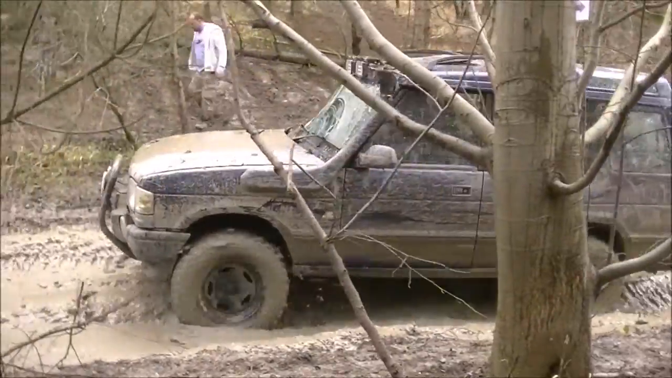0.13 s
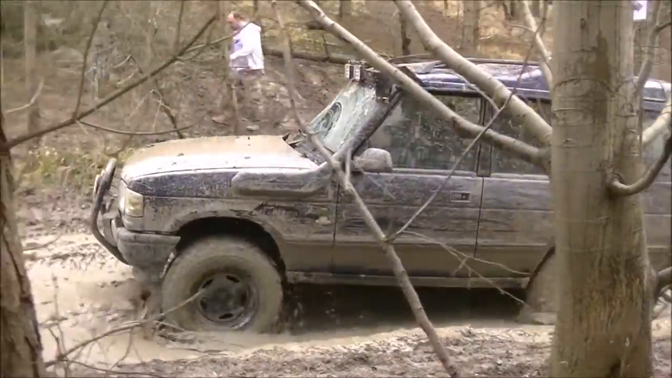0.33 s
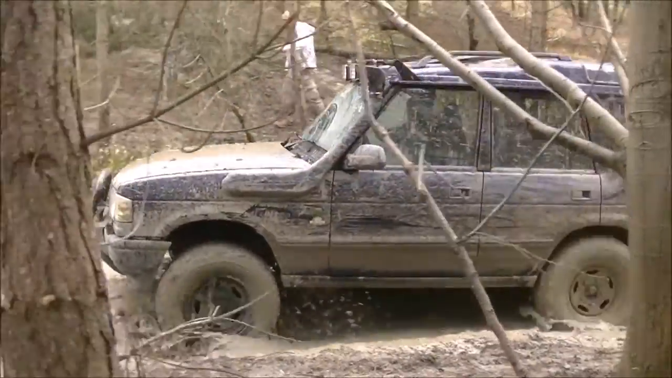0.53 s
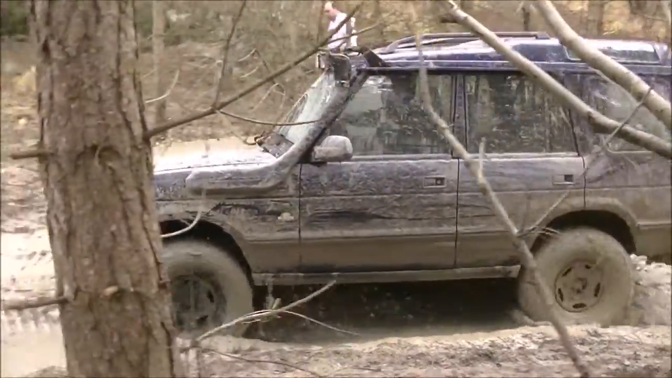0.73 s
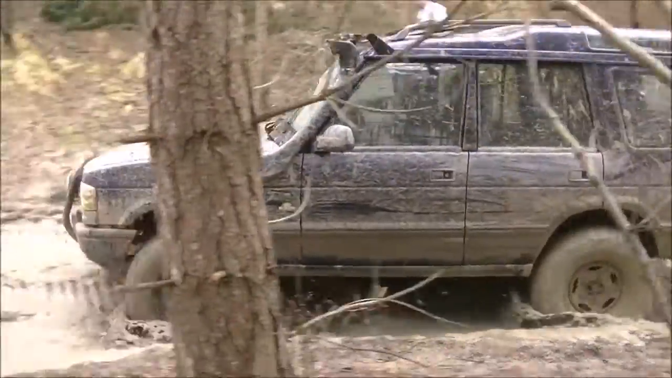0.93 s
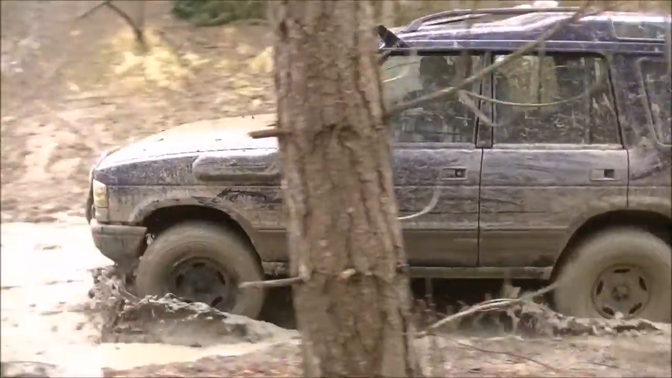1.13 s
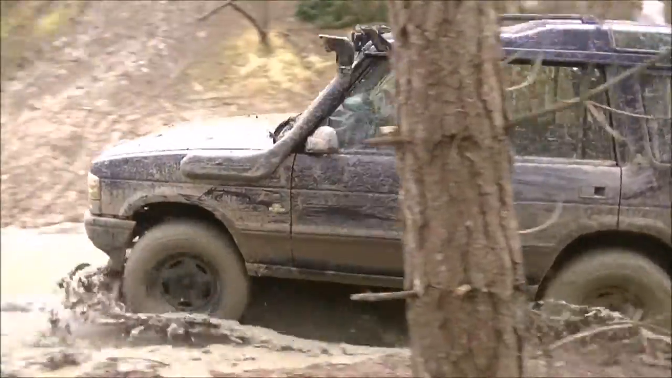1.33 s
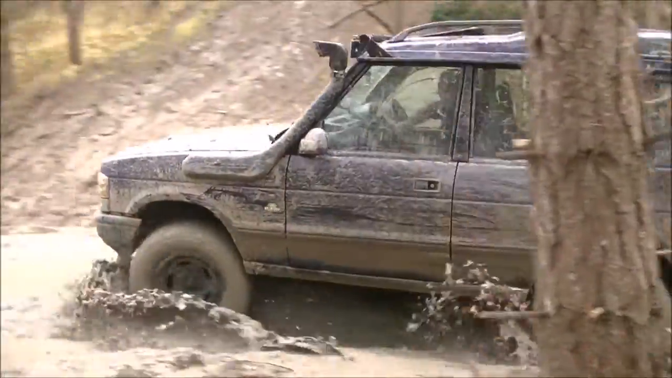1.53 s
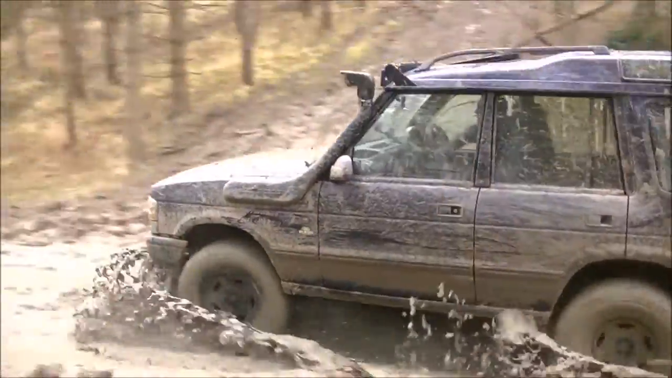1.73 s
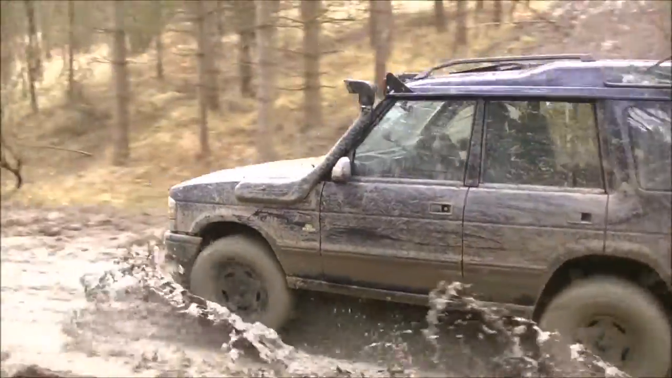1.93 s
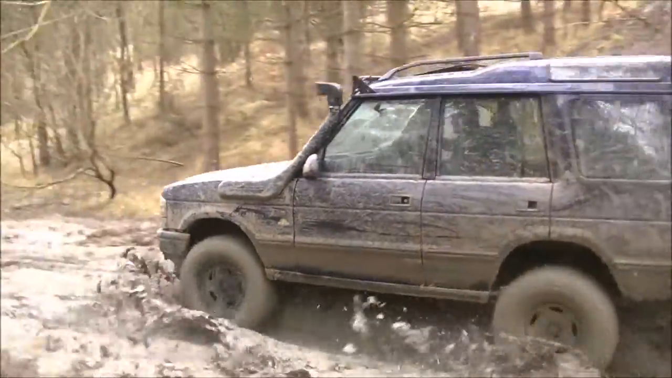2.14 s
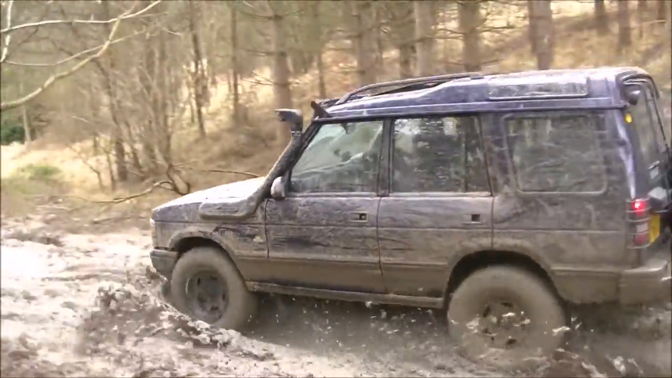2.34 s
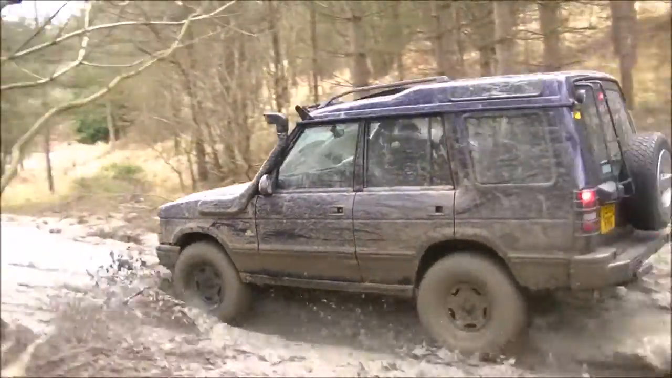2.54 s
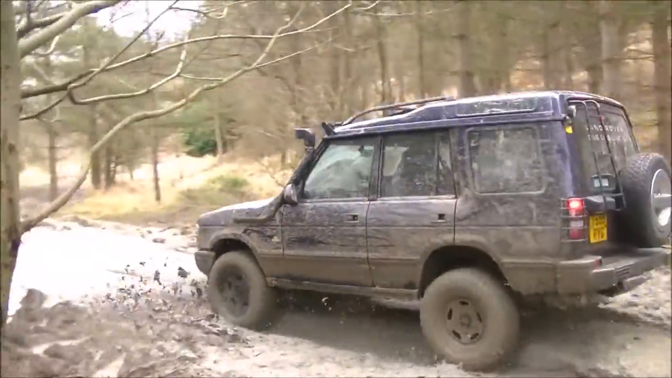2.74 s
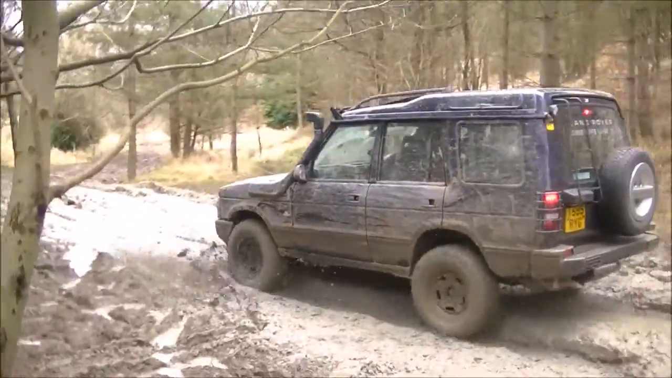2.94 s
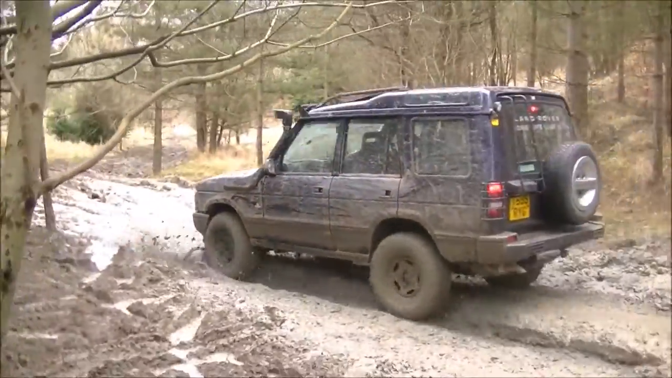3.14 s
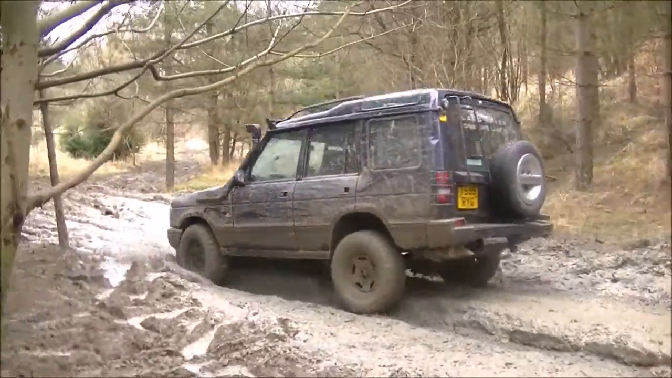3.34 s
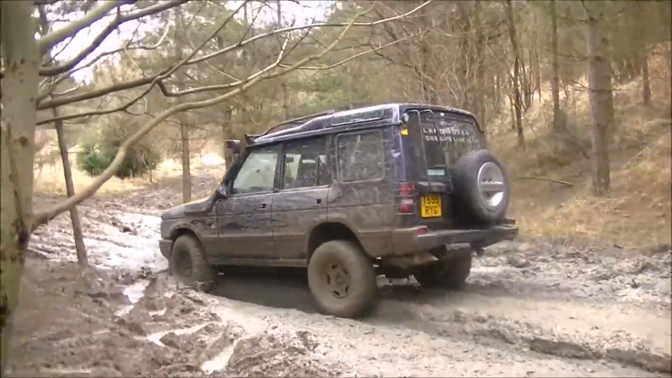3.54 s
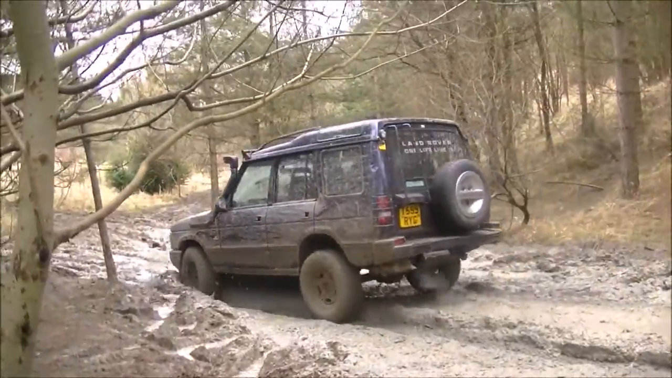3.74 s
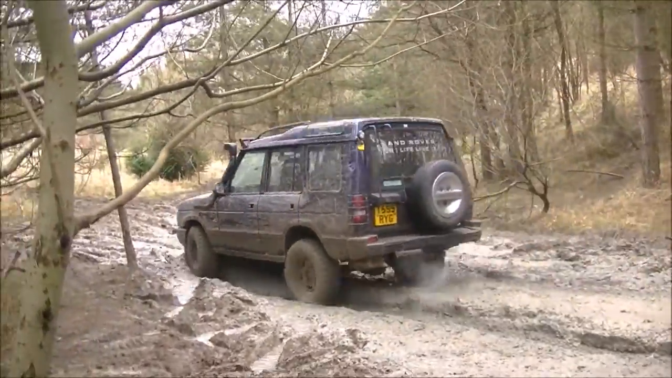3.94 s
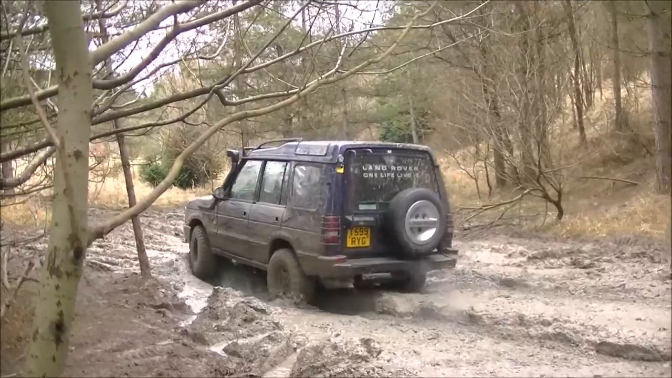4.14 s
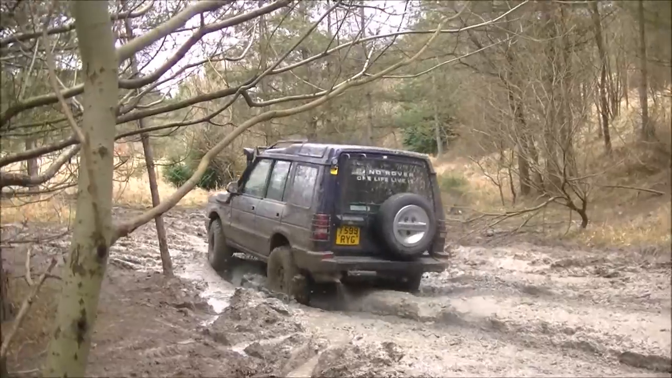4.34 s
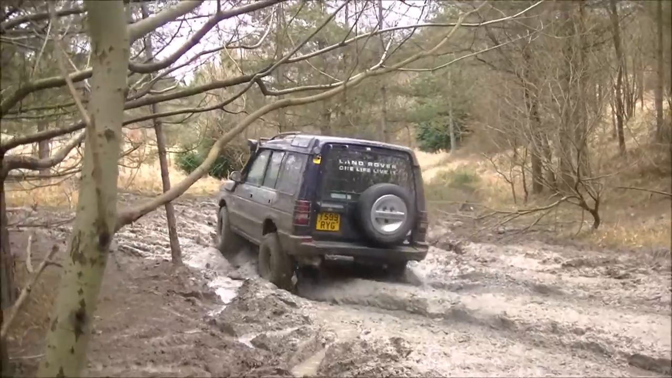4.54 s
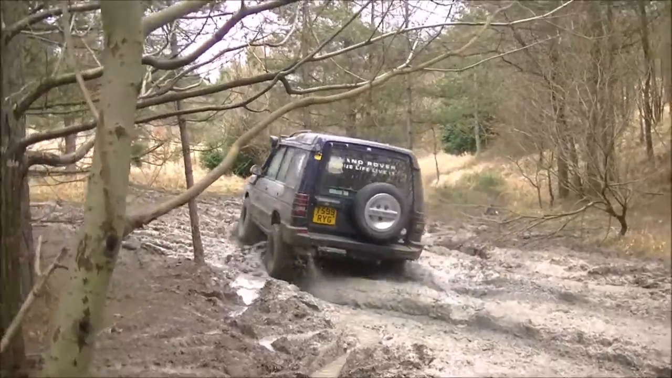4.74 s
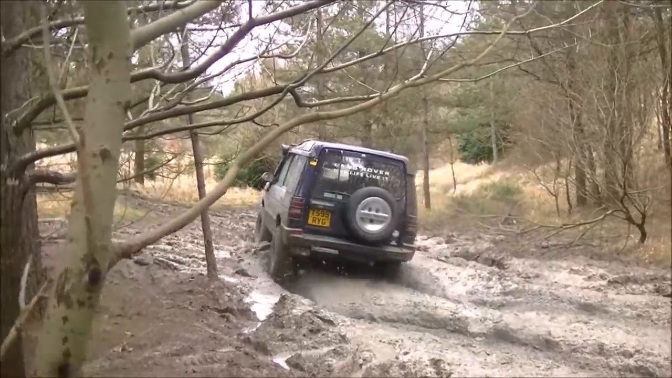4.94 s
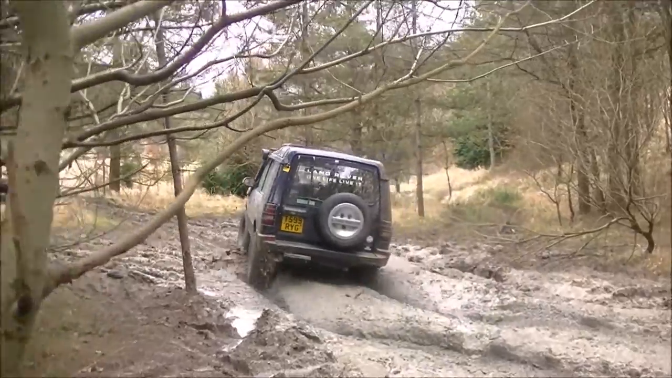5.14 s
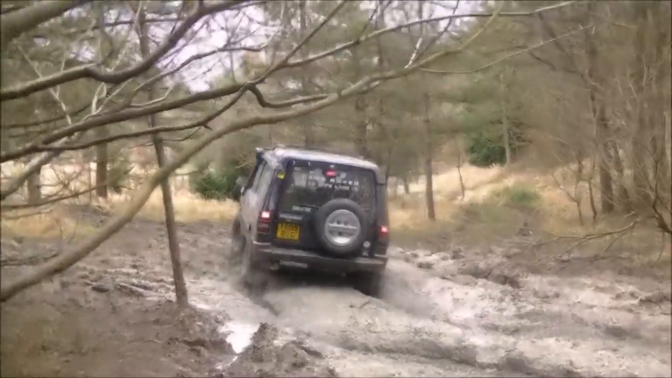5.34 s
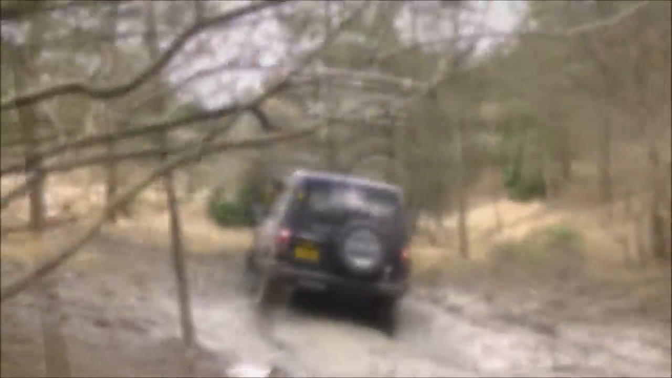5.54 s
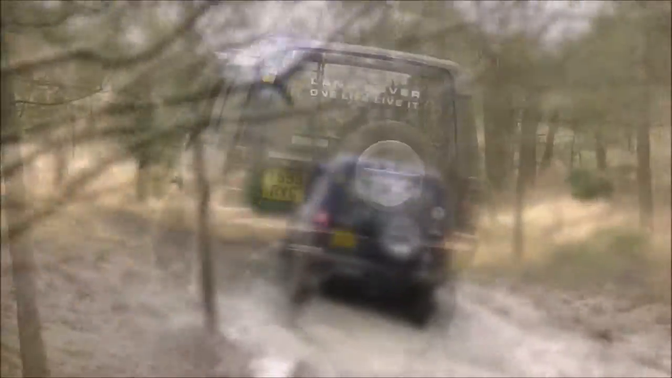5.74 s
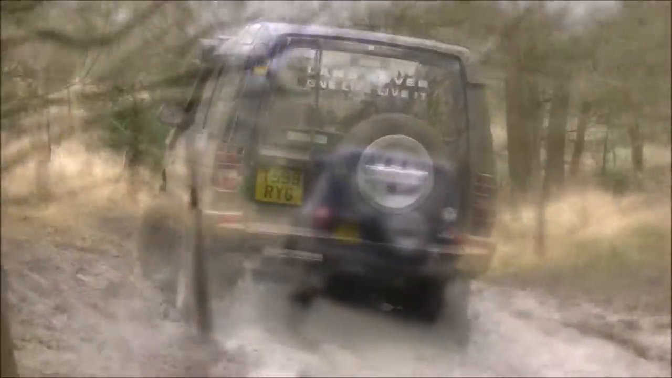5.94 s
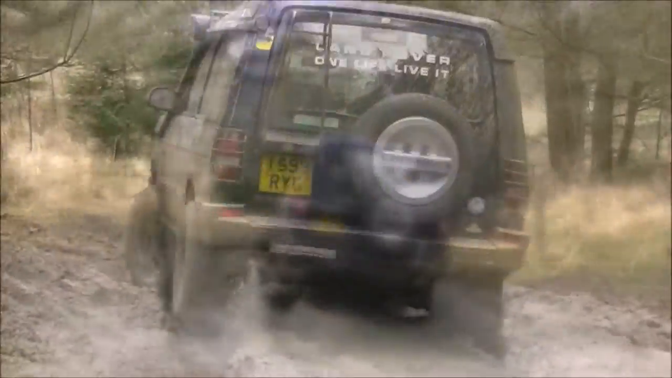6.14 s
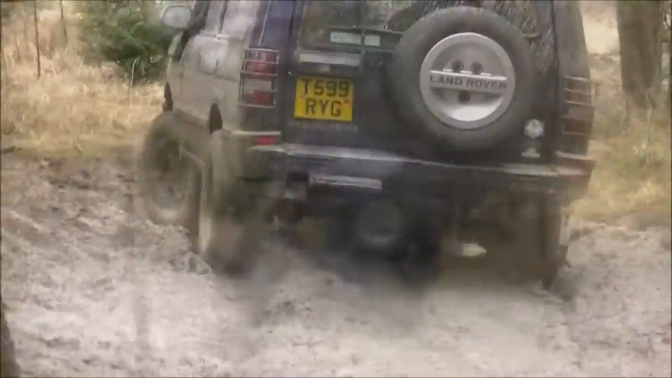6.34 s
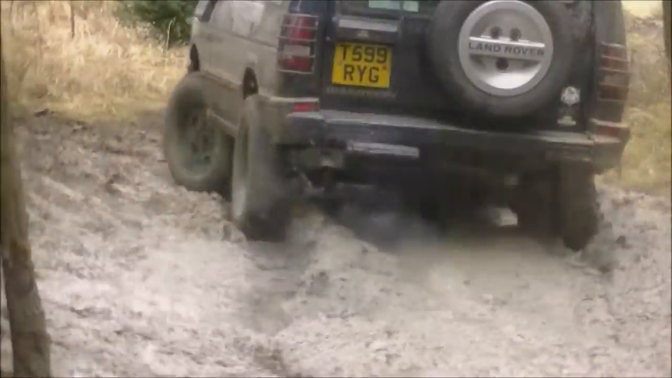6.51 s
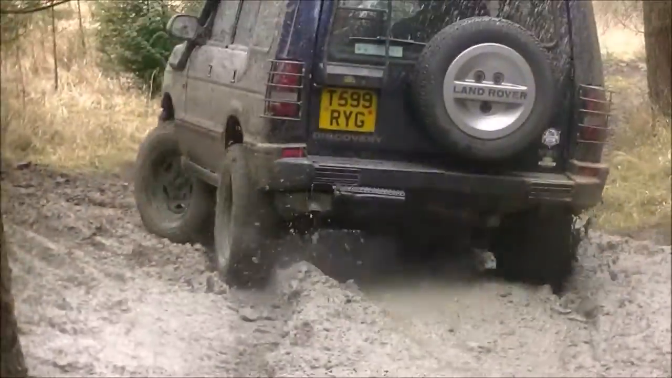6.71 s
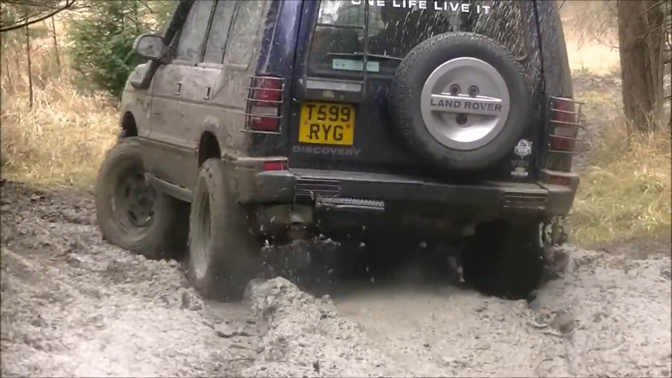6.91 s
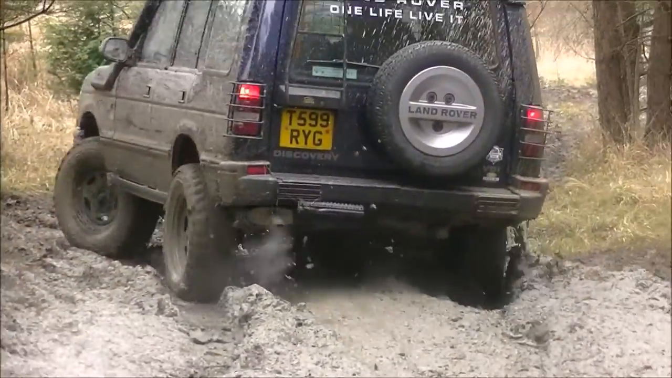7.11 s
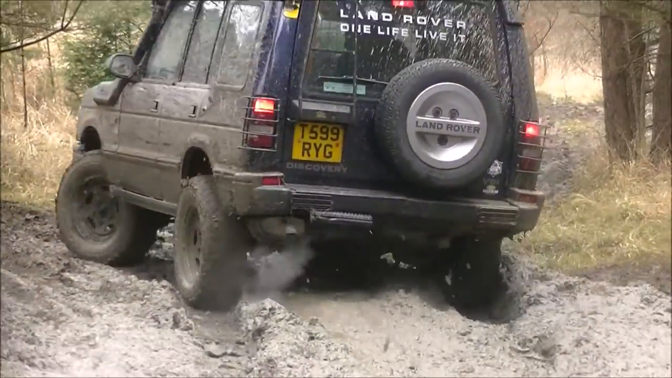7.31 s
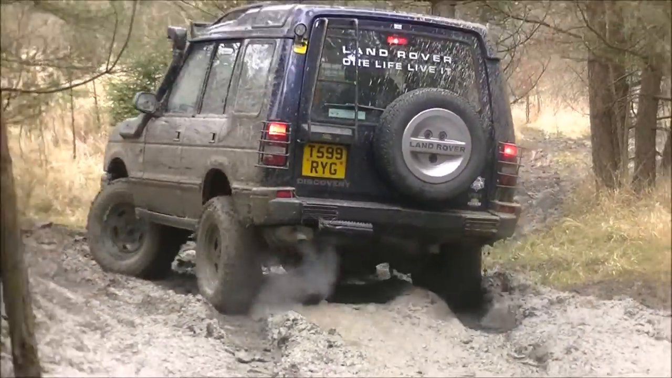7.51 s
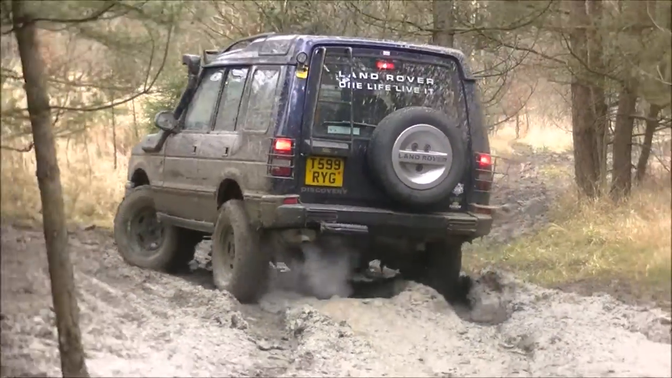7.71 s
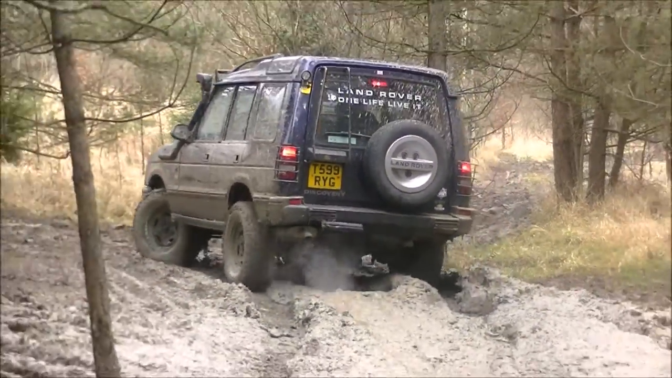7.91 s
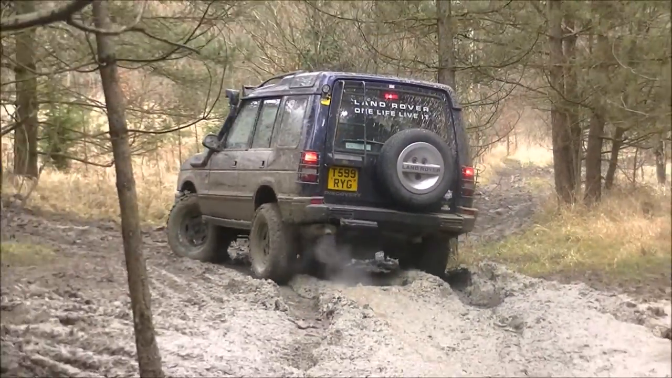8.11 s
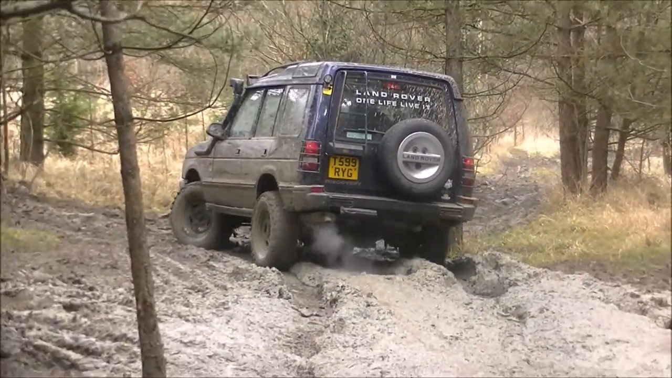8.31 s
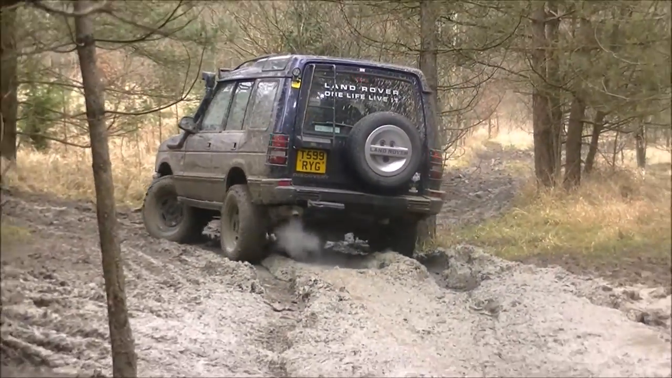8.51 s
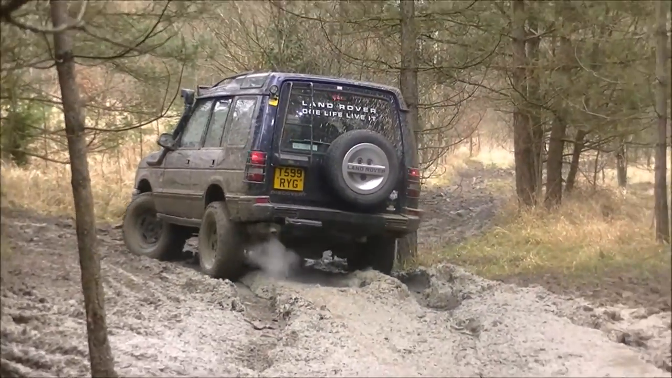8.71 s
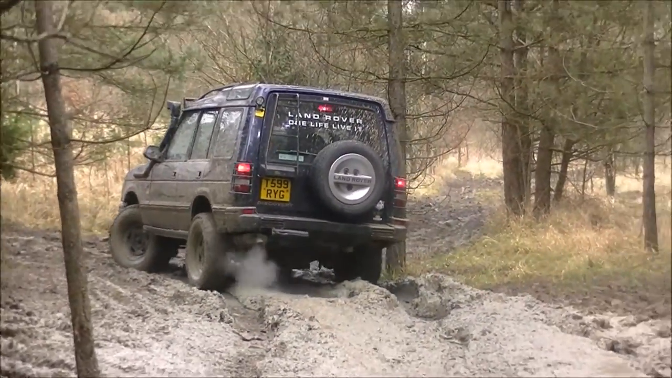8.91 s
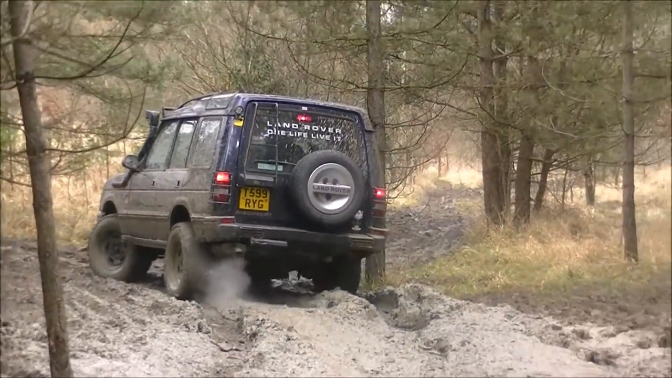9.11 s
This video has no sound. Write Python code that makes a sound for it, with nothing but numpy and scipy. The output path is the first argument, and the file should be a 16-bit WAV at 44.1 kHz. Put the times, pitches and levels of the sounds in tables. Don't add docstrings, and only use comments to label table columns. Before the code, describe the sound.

A heavy off-road vehicle ploughs through a muddy woodland track. Slosh and hissing spray swell to a peak around two seconds while the engine and whining fan climb, then ease. Two more revs follow with sharp wet slaps and hard cracks near the microphone. The wheels slow, lumps drop off, and a quiet idle remains with drips and ticks. Small, bright, bass-light camera microphone, overloading on the hardest hits.

```python
import sys
import numpy as np
from scipy import signal
from scipy.fft import rfft, irfft, next_fast_len
from scipy.io import wavfile
from scipy.ndimage import uniform_filter1d

SR = 44100
rng = np.random.default_rng(int(sys.argv[2]) if len(sys.argv) > 2 else 0)


def decibels_to_gain(level_db):
    exponent = np.asarray(level_db, float) / 20
    return 10 ** exponent


def store_pcm(level_fs):
    pcm = np.round(np.clip(level_fs, -1, 1) * 32767).astype(np.int16)
    wavfile.write(sys.argv[1], SR, np.atleast_2d(pcm).T)


N = 408366
HZ = np.fft.rfftfreq(next_fast_len(N + SR // 2), 1 / SR)
MID_LOAD_DB = -40

# t/s, fan whine f/Hz, load level/dB, belt grip level/dB
ENGINE = [(0.0, 412.4, -40, 4), (0.62, 444.7, -37.5, 1), (0.85, 485.1, -36, -6), (1.0, 521.3, -33.5, -5),
          (1.3, 575, -36, 3), (1.42, 605, -30.5, -11), (1.6, 640, -37, 2.5), (1.85, 678.5, -34.5, 4.5),
          (2.02, 585, -40, 1.5), (2.24, 480, -38, -2), (2.84, 326, -47.5, 0), (3.9, 290, -51, -4),
          (4.2, 461.6, -36.5, -8), (4.5, 519.3, -35.5, -3), (4.8, 545, -39.5, -6), (5.0, 571, -38, 2.5),
          (5.35, 390.2, -48.5, -9), (5.72, 465.6, -43, 2), (5.95, 530, -38, -9), (6.12, 575, -36, -3),
          (6.33, 605, -37, 1), (6.5, 612, -35.5, -9), (6.68, 625, -38, -2), (6.85, 632, -38, 1.5),
          (7.0, 560, -38.5, -4), (7.17, 450, -46, 3), (7.45, 200, -58, 2), (7.7, 107.8, -64, 0.1)]
# t/s, churn level/dB, fineness of the spray/dB, depth of the slop/dB
CHURN = [(0.0, -28.5, 0.5, 1), (0.35, -24, 2, 0.5), (0.8, -21, 1, -1.5), (1.3, -17, 0, -1),
         (1.7, -16.5, 1.5, 0), (2.0, -16.5, 1, -1), (2.3, -15.5, 3.5, 0.5), (2.55, -18.5, 3, 0.5),
         (2.93, -19, 0.5, 0.5), (3.25, -24, 2, -1), (3.65, -26, 1, 3), (4.0, -27.5, 0, 1),
         (4.8, -23.5, -2.5, 0.5), (5.18, -25, -0.5, 1.5), (5.38, -29.5, 1.5, 0), (5.93, -31, -1, 0),
         (6.4, -26.5, -5, -1.5), (6.8, -27.5, -4, -0.5), (7.05, -31, -2, -1.5), (7.3, -35, -1.5, -2),
         (7.7, -43.5, -1, -1), (8.13, -49, 0, 0.5), (8.45, -50, 0.5, 0.5), (8.8, -53.5, -1, 1.5)]
# f/Hz, level/dB
CAPSULE = [(60, -77), (130, -24.5), (300, -10), (500, -6), (700, -5), (1100, -2), (2000, 2)]
# f/Hz, level/dB
PORT = [(2900, 0.5), (3800, 1), (4400, 5), (4900, -2), (5400, -8.5), (6600, -11), (7900, -6.5),
        (9000, -13.5), (10700, -23.5), (11700, -16), (14000, -19), (15700, -21.5), (15900, -55)]


def along(points):
    f, v = np.transpose(points)
    return np.interp(np.log(HZ + 1), np.log(f + 1), v)


def curves(rows):
    s, *cols = np.transpose(rows)
    return [np.interp(np.arange(N) / SR, s, c) for c in cols]


def filtered(x, response):
    m = 2 * len(HZ) - 2
    return irfft(rfft(x, m) * response, m)[..., :N]


def microphone_db():
    return along(CAPSULE + PORT)


def heard(x):
    m = 2 * len(HZ) - 2
    return x * np.sqrt(N * m / 2) / np.linalg.norm(rfft(x, m) * decibels_to_gain(microphone_db()))


def band(lo_hz, hi_hz):
    low, high = 1j * HZ / lo_hz, 1j * HZ / hi_hz
    rise = low ** 2 / (1 + np.sqrt(2) * low + low ** 2)
    fall = 1 / (1 + np.sqrt(2) * high + high ** 2)
    return (rise * fall) ** 2


def resonances(modes):
    total = 0
    for k, (hz, width, db) in enumerate(modes):
        total = total + (-1) ** k * decibels_to_gain(db) * 1j * HZ * width / (hz * hz - HZ ** 2 + 1j * HZ * width)
    return total


def wobble(rate):
    knots = rng.standard_normal(int(N * rate / SR) + 2)
    return np.interp(np.arange(N) * rate / SR, np.arange(len(knots)), knots)


def droplets(hz, cycles, spread_db, count):
    u = rng.random((count, 2))
    f = hz * np.exp(0.41 * np.clip(rng.standard_normal((count, 1)), -1.3, 2.5))
    size = decibels_to_gain(-spread_db * np.log(u[:, 1:] + 0.03))
    k = np.arange(int(4 * max(cycles, 0.5) * SR / hz))
    ring = size * np.sin(2 * np.pi * f * k / SR) * np.exp(-k * f / SR / cycles)
    start = (u[:, :1] * N).astype(int)
    return np.bincount((start + k).ravel(), ring.ravel(), N)[:N]


def splash(edges, surge, drops, drop_db, patchy_db):
    z = signal.stft(rng.standard_normal(N + 512), nperseg=256)[2]
    field = rng.standard_normal(z.shape)
    field = uniform_filter1d(uniform_filter1d(field, 4, 0), 8, 1)
    rush = signal.istft(z * decibels_to_gain(patchy_db * field / field.std()), nperseg=256)[1][:N]
    water = rush / rush.std() + decibels_to_gain(drop_db) * drops / drops.std()
    return heard(decibels_to_gain(surge) * filtered(water, edges))


def churn():
    churn_db, fine_db, _ = curves(CHURN)
    late = np.arange(N) / SR - 9.01
    rise_s, fall_s = 0.023, 0.046
    slide_db = 9 * np.exp(np.minimum(late / rise_s, -late / fall_s))
    return churn_db + slide_db, fine_db + 0.83 * slide_db


def mud():
    # f/Hz, width/Hz, level/dB
    arch = [(700, 97, -29)]
    churn_db, fine_db = churn()
    load, stir = curves(ENGINE)[1] - MID_LOAD_DB, churn_db + 25
    wallow_db = -32 + 0.76 * load + 0.54 * stir
    slosh_db = -25 + 0.13 * load + 0.92 * stir - 0.41 * fine_db + curves(CHURN)[2]
    spray_db = churn_db + 1.28
    mist_db = churn_db - 9 + 0.95 * fine_db
    trickle_db = -39.5 + 0.54 * stir

    surge = 1.2 * wobble(3.9) + 2.4 * wobble(9) + 1.2 * wobble(20) + 2.0 * wobble(80)
    lumps = 6 * np.tanh(surge / 6)
    clods = droplets(hz=1520, cycles=0.48, spread_db=1.8, count=2500)
    spatter = droplets(hz=4500, cycles=1.0, spread_db=4, count=6000)

    hollow = band(504, 868) * band(380, 20000) * (1 + resonances(arch))
    wallow = splash(hollow, 0.3 * lumps, clods, drop_db=-20, patchy_db=1.8)
    slosh = splash(band(787, 3700), 0.32 * lumps, clods + 1.23 * spatter, drop_db=-10.5, patchy_db=1.3)
    spray = splash(band(3030, 6370), 0.2 * lumps, spatter + 0.45 * clods, drop_db=-7.0, patchy_db=1.16)
    mist = splash(band(7160, 17200), 0.45 * lumps, spatter, drop_db=-4.5, patchy_db=0.2)
    trickle = splash(band(5200, 6800), 0.5 * lumps, spatter, drop_db=-10, patchy_db=2)
    deep = decibels_to_gain(wallow_db) * wallow + decibels_to_gain(slosh_db) * slosh
    return deep + decibels_to_gain(spray_db) * spray + decibels_to_gain(mist_db) * mist + decibels_to_gain(trickle_db) * trickle


def firings(rate, sizes_db, scatter_db):
    count = np.cumsum(rate / SR)
    at = np.flatnonzero(np.diff(np.floor(count))) + 1
    size_db = np.take(sizes_db, count[at].astype(int), mode="wrap")
    pulses = np.zeros(N)
    pulses[at] = decibels_to_gain(size_db + scatter_db * rng.standard_normal(len(at)))
    return pulses / np.sqrt(rate), count


def exhaust(whine_hz, load):
    # f/Hz, width/Hz, level/dB
    pipe = [(200, 110, -0.5), (342, 73, 0.5), (450, 58, 1.5), (757, 75, -6.5)]
    cylinders = [-2, 5.5, -26, -6, 0, -25, -4.5, -31]
    t = np.arange(N) / SR
    fan_ratio = 8.72
    pulses, count = firings(4 * whine_hz / fan_ratio, cylinders, scatter_db=5.0)
    gas = 1.3 * rng.standard_normal(N) * (1 + np.cos(2 * np.pi * count)) / np.sqrt(SR)
    throb = heard(filtered(decibels_to_gain(-0.6 * t) * pulses + gas, resonances(pipe) * band(110, 980)))

    boom = decibels_to_gain(-1 - 2.2 * t + 3 * wobble(9)) * np.sin(2 * np.pi * count + 0.5 * wobble(30))
    drone = heard(filtered(gas, resonances([(458.7, 24, 0)]) ** 2))
    drone = decibels_to_gain(-14 + 0.4 * load + 3.5 * wobble(8)) * drone
    return decibels_to_gain(0.87 * load - 42.5) * (throb + boom + drone)


def belts(whine_hz, load, grip_db):
    # pitch over the fan's, level/dB
    pulley_tones = [(0.74, -14), (1.15, -7), (1.27, -9)]
    # f/Hz, width/Hz, level/dB
    bonnet = [(485, 28, 1), (590, 56, 2.5), (765, 85, 0.5)]
    whine_db = -45.5 + grip_db + 5.5 * np.log2(whine_hz / 500) + 0.75 * load
    whine_db = whine_db - 0.39 * np.arange(N) / SR
    turn = 2 * np.pi * np.cumsum(whine_hz * (1 + 0.012 * wobble(40) + 0.006 * wobble(6))) / SR
    whine = decibels_to_gain(3.2 * wobble(17) + wobble(7) + 2.5) * heard(np.sin(turn))
    for ratio, db in pulley_tones:
        whine += decibels_to_gain(db - 2 + 4 * wobble(7)) * heard(np.sin(ratio * turn + 1.5 * wobble(25)))
    panels = 1 + sum(np.abs(resonances([panel])) for panel in bonnet)
    return filtered(decibels_to_gain(whine_db - 4.5) * whine, panels)


def engine():
    whine_hz, load_db, grip_db = curves(ENGINE)
    load = load_db - MID_LOAD_DB
    return exhaust(whine_hz, load) + belts(whine_hz, load, grip_db)


def slaps():
    # t/s, peak level/dB, f/Hz
    splats = [(0.402, -8, 4080), (2.462, 2.5, 4270), (2.498, 5, 4300), (2.901, -2.5, 1960),
              (2.928, -3, 2360), (2.997, 0, 4470), (3.505, -9, 4100), (3.511, -6, 3340), (3.742, -11, 4000),
              (3.842, -9, 4280), (3.904, -19, 3920), (4.066, -7.5, 870), (4.103, -2, 4170),
              (4.14, -12, 905), (4.155, -13, 700), (4.206, -10, 4500), (4.267, -12, 4185),
              (4.297, -20, 4200), (4.316, -14, 1200), (2.717, -13, 4330), (2.976, -14, 4330),
              (3.168, -6, 4050), (3.209, -11, 2164), (3.562, -14, 1510), (4.663, -7.5, 1600),
              (4.69, -5, 2130), (4.697, -6, 920), (4.772, -15, 2203), (5.177, -8.5, 2317),
              (5.432, -12.5, 2060), (4.082, -5.5, 1900), (4.097, -8, 4470), (4.124, 0.5, 2230),
              (4.259, -7, 730), (4.278, -5.5, 780), (4.5, -8, 1640), (4.524, -15, 996), (4.841, -5.5, 970),
              (4.977, -3.5, 4300), (5.04, -4.5, 2068), (5.057, -6.5, 2050), (5.095, -4, 4480),
              (5.201, -7.5, 2263), (5.301, -7.5, 2100), (5.553, -14, 1813), (5.623, -12.5, 2264),
              (5.658, -12.5, 1540), (5.938, -10, 650)]
    # t/s, peak level/dB, f/Hz
    wheel_lumps = [(6.986, -6, 1943), (7.138, -17, 3560), (7.174, -23, 2077), (7.205, -11, 1940),
                   (7.213, -7.5, 2100), (7.236, -13, 1780), (7.298, -26, 2467), (7.345, -12, 2380),
                   (7.373, -13, 1720), (7.376, -16, 2500), (7.196, -21, 4400), (7.127, -20, 4400),
                   (7.75, -30, 700), (7.396, -17, 2670), (7.415, -19, 3100), (7.463, -28, 2080),
                   (7.54, -27, 3160), (7.579, -19, 3470), (7.58, -27, 650), (7.6, -22, 2390),
                   (7.623, -19.5, 1790), (7.681, -18, 3900), (7.693, -28, 2720), (7.703, -22, 1675),
                   (7.743, -36, 2180), (7.765, -34, 3190), (7.779, -26, 3080), (7.794, -26, 1940),
                   (7.852, -24, 1870), (7.883, -15.5, 1830), (7.906, -24, 2400), (8.133, -15.5, 3150),
                   (7.648, -27, 1800), (7.832, -30, 2280), (8.209, -36.5, 1490), (8.319, -33, 1500),
                   (9.075, -26, 2960), (9.178, -22, 1410)]
    # t/s, peak level/dB, f/Hz
    drips = [(7.7074, -21, 4500), (7.721, -31, 4400), (7.8074, -32, 4300), (7.8584, -28, 4220),
             (7.9224, -26, 4240), (7.9478, -28, 4040), (8.1125, -29, 2400), (8.1604, -28, 4270),
             (8.2003, -25.5, 4380), (8.2382, -36, 3980), (8.2581, -25, 4360), (8.2704, -29, 4300),
             (8.2985, -30, 4240), (8.3944, -36, 3910), (8.4644, -32, 4400), (8.5819, -27, 4390),
             (8.6168, -31, 4330), (8.6552, -22, 4270), (8.6722, -21.5, 4450), (8.6804, -33, 4440),
             (8.808, -36, 4110), (8.8504, -27, 3680), (8.8672, -29, 3980), (8.9087, -33, 4310),
             (8.995, -28, 4260), (9.0197, -31, 4820)]
    # t/s, peak level/dB, f/Hz
    grit = [(7.0674, -31, 7970), (7.1264, -33, 8370), (7.1384, -32, 8410), (7.1774, -34, 8030),
            (7.2045, -29, 7400), (7.2394, -37, 8020), (7.3024, -29, 8370), (7.3143, -32, 7930),
            (7.3971, -38, 7900), (7.4254, -36, 7800), (7.4994, -28, 8050), (7.5797, -37, 7890),
            (7.6814, -38, 7680), (7.7747, -36, 8030), (8.0895, -40, 8170), (8.2003, -42, 7970),
            (8.2574, -42, 7980), (8.2801, -34, 8060), (8.3958, -42, 8080), (8.7226, -40, 7560),
            (8.777, -44, 7880), (8.8493, -48, 8460), (8.98, -37, 7520), (9.1524, -42, 7490)]
    # level/dB, thud level/dB, snap level/dB, 60 dB decay/s, breadth of pitch
    splat = (0.3, -20, -30, 0.015, 1.9)
    lump = (-0.5, -14, -32, 0.006, 2.3)
    drip = (1.5, -24, -28, 0.011, 1.6)
    fleck = (-1.5, -40, -40, -1, 1.5)
    kinds = [(splats, splat), (wheel_lumps, lump), (drips, drip), (grit, fleck)]
    blows = [(*row, *kind) for rows, kind in kinds for row in rows]

    out, t, mic_db = np.zeros(N + SR), np.arange(SR // 25) / SR, microphone_db()
    gain = lambda hz: decibels_to_gain(-np.interp(hz, HZ, mic_db))
    bright = signal.butter(2, 4800, "high", fs=SR)
    for s, db, hz, kind_db, thud_db, snap_db, t60, breadth in blows:
        fade = decibels_to_gain(-60 * t / max(t60, 0.003))
        shock = fade * rng.standard_normal((2, len(t)))
        breadth = max(breadth, 1.1)
        edges = [hz / breadth ** 1.36, min(hz * breadth ** 0.66, 18000)]
        body = signal.butter(2, edges, "band", fs=SR)
        blow = 0.3 * fade * np.sin(2 * np.pi * hz * t) + 4 * (t == 0)
        ring = signal.lfilter(*body, shock[0] + blow)
        ring = ring / np.abs(ring).max() * gain(hz)
        thud = decibels_to_gain(thud_db - 60 * t / 0.0056) * np.sin(2 * np.pi * 760 * t) * gain(770.0)
        snap = decibels_to_gain(1.2 * snap_db + 25.0) * signal.lfilter(*bright, shock[1])
        soft_db = min(0, 5.5 * np.log2(hz / 1800))
        out[round((s + 0.0008) * SR):][:len(t)] += decibels_to_gain(db + kind_db + soft_db) * (ring + snap + thud)
    return out[:N]


def cracks():
    # t/s, peak level/dB, lowest f/Hz, ring f/Hz, highest f/Hz, jolt level/dB
    flecks = [(4.6797, -10, 2600, 5500, 9000, -68), (4.8112, 2, 2600, 4460, 6040, -46),
              (4.8575, -9, 3000, 5150, 8000, -75), (5.8415, 3, 2520, 3500, 7950, -50),
              (6.1365, -2.5, 2404, 3380, 6000, -56), (6.1355, -10, 6000, 7560, 8500, -90),
              (6.1691, -2, 2600, 3900, 5200, -53), (6.8132, -5, 2200, 4070, 5200, -66),
              (6.8150, -19, 9000, 10600, 12000, -90), (6.82, -10, 2600, 4300, 5200, -90),
              (7.992, -9.5, 2020, 4630, 9900, -85), (8.045, -1, 1950, 4300, 8800, -85),
              (9.177, -21.5, 6010, 7660, 10000, -90), (9.227, -35, 350, 800, 1500, -71)]
    crack_t60_s, shell_t60_s, jolt_s = 0.0054, 0.0062, 0.002
    out, t = np.zeros((2, N + SR)), np.arange(SR // 20) / SR
    for s, db, low_hz, ring_hz, top_hz, jolt_db in flecks:
        burst = decibels_to_gain(-60 * t / crack_t60_s) * rng.standard_normal((2, len(t)))
        burst[0, 0] = 2
        burst = signal.lfilter(*signal.butter(3, top_hz, fs=SR), burst)
        burst[0] += decibels_to_gain(-2 - 60 * t / shell_t60_s) * np.sin(2 * np.pi * ring_hz * t)
        burst = signal.lfilter(*signal.butter(4, low_hz, "high", fs=SR), burst)
        pair = burst[0] + 0.27 * burst[1] * np.array([[1], [-1]])
        crack = decibels_to_gain(db) * pair / np.abs(burst[0]).max()
        jolt = decibels_to_gain(jolt_db) * t / jolt_s * np.exp(1 - t / jolt_s)
        out[:, round((s + 0.0011) * SR):][:, :len(t)] += crack + jolt
    return out[:, :N]


def buzzes():
    # middle t/s, length t/s, f/Hz, level/dB
    panels = [(0.75, 0.27, 453, -37.5), (1.181, 0.24, 765, -28.5), (1.252, 0.28, 682, -29),
              (1.46, 0.22, 744, -27.5), (1.59, .1, 716, -24), (1.53, 0.26, 808, -30),
              (1.72, .15, 1025, -32), (1.78, 0.17, 503, -31), (1.819, 0.066, 904, -29),
              (2.219, 0.28, 778, -32), (2.301, 0.088, 655, -29), (4.05, 0.19, 505, -40),
              (4.45, 0.18, 416, -38), (4.451, 0.13, 610, -39), (4.681, 0.21, 401, -38.5),
              (4.748, .18, 303, -48), (6.02, .35, 654, -38.5), (6.05, 0.27, 464, -42.5),
              (6.4, 0.34, 448, -36.5), (6.42, 0.28, 339, -40), (6.621, 0.19, 767.7, -44),
              (6.75, 0.3, 465, -36.5), (2.13, 0.25, 760, -36), (2.45, .12, 824, -36),
              (2.852, .25, 310, -50), (4.929, .2, 561, -38), (4.2, 0.22, 205, -53), (7.11, .14, 461, -42)]
    t, mic_db = np.arange(N) / SR, microphone_db()
    waver = np.cumsum(0.014 * wobble(30)) / SR
    rough = decibels_to_gain(4.5 * wobble(22) - 3)
    climb = 0.14
    out = np.zeros(N)
    for s, length, hz, db in panels:
        near = np.abs(t - s) < length * 0.75
        late = t[near] - s
        swell = np.cos(np.pi * late / (1.5 * length)) * rough[near]
        tone = np.sin(2 * np.pi * hz * (late + climb * late ** 2 / 2 + waver[near]))
        out[near] += decibels_to_gain(db - np.interp(hz, HZ, mic_db)) * swell * tone
    return np.sqrt(2) * out


def tick_over():
    # multiple of the crank's turning rate, level/dB
    orders = [(12, -13), (12.5, -18), (13.5, -15), (14, -8), (14.5, -11), (15, -1), (15.5, -5), (16, -12),
              (16.5, -11), (20, -12), (22, -12), (24, -8), (24.5, -7), (25, -1), (25.5, -5), (26, -9),
              (27, -10), (32.5, -13), (33, -10)]
    crank = 2 * np.pi * np.cumsum(12.24 * (1 + 0.002 * wobble(3))) / SR
    hum = np.zeros(N)
    for k, db in orders:
        hum += decibels_to_gain(db + 1 + 3.5 * wobble(14)) * np.sin(k * crank + 2 * np.pi * rng.random())
    duck_db = np.maximum(-3.5, -0.2 * (curves(ENGINE)[1] - ENGINE[-1][2]))
    return decibels_to_gain(-62.5 + duck_db) * hum * decibels_to_gain([[-1], [1]])


def air():
    # f/Hz, level/dB per Hz
    still_air = [(25, -25), (110, -17), (250, -11), (340, -13), (460, 0), (900, -2), (2000, -20),
                 (5000, -60)]
    # f/Hz, level/dB per Hz
    soil = [(20, -3), (60, -3), (120, 2), (160, -6), (250, -60)]
    both, apart = filtered(rng.standard_normal((2, N)), decibels_to_gain(along(still_air)))
    shake = filtered(rng.standard_normal(N), decibels_to_gain(along(soil))) * decibels_to_gain(2.4 * wobble(22.9))
    stir = decibels_to_gain(-63) * np.array([both + 0.35 * apart, both - 0.35 * apart]) / both.std()
    return stir + decibels_to_gain(churn()[0] - 50.0) * shake / shake.std()


def scene():
    # f/Hz, likeness
    alike = [(60, 0.94), (130, 0.94), (290, 0.96), (640, 0.985), (1410, 0.97), (3100, 0.94), (6820, 0.86),
             (15000, 1.0)]
    # f/Hz, phase/rad
    lead = [(0, 0), (690, 0.2), (2670, -0.0), (3450, 0.3), (5170, -0.1), (5680, 0.3), (6290, -0.3),
            (8100, -0.3), (9560, 0.0), (16200, 0.0)]
    # f/Hz, level/dB
    lean = [(60, -.5), (130, -1), (260, -2), (500, -3.5), (1000, -0.3), (2000, -1.1), (4400, 0.5),
            (8000, 0), (10000, -4)]
    near = mud() + engine() + slaps() + buzzes()
    t = np.arange(SR // 5) / SR
    trunks = rng.standard_normal(len(t)) * decibels_to_gain(-60 * t / 0.14)
    scatter = signal.fftconvolve(near, trunks / np.linalg.norm(trunks))[:N]
    apart = HZ < 10000
    turn = apart * 0.92 * np.arccos(np.clip(along(alike), 0, 1)) / 2
    half = decibels_to_gain(apart * along(lean) / 2) * np.exp(0.5j * apart * along(lead))
    direct = filtered(near, np.cos(turn) * np.array([half, 1 / half]))
    return direct + filtered(scatter, np.sin(turn) * np.array([[1], [-1]]))


def microphone():
    c = irfft(np.log(np.maximum(decibels_to_gain(microphone_db()), 1e-6)))
    c[1:len(c) // 2] *= 2
    c[len(c) // 2 + 1:] = 0
    return np.exp(rfft(c))


def low_pass(x):
    return signal.sosfilt(signal.butter(12, 16610, fs=SR, output="sos"), x)


def record(dry):
    x = filtered(dry, microphone())
    squashed = x / (1 + np.abs(x / 1.05) ** 6) ** (1 / 6)
    x = filtered(squashed, band(90, 60000)) + air() + tick_over() + cracks()
    treble_limit = np.clip((16700 - HZ) / 900, 0, 1)
    mix = filtered(np.clip(x, -1, 1), treble_limit)
    return low_pass(mix)


dry = scene()
out = record(dry)
store_pcm(out)
```